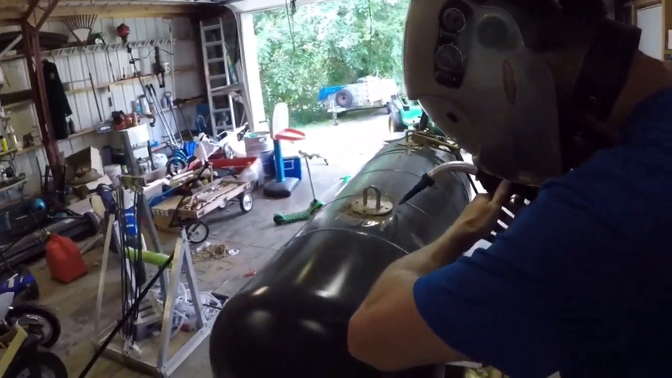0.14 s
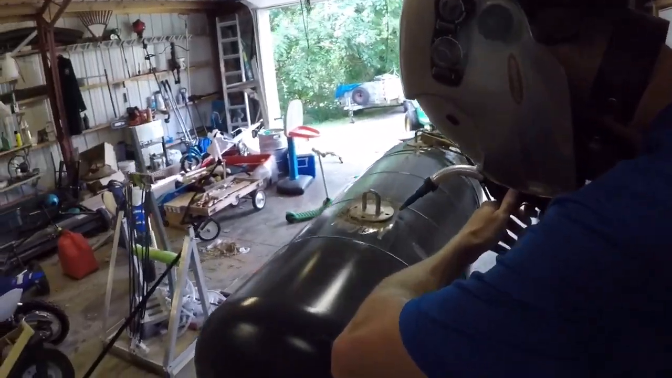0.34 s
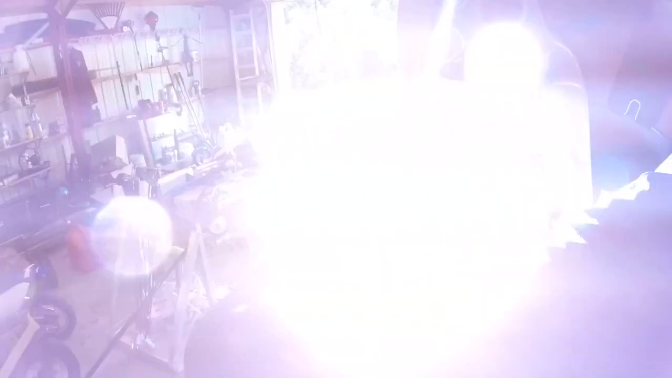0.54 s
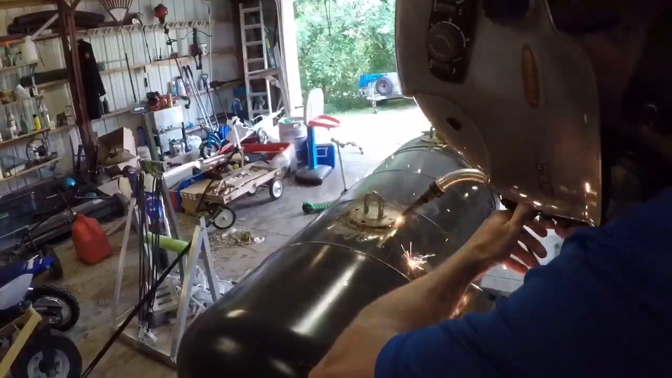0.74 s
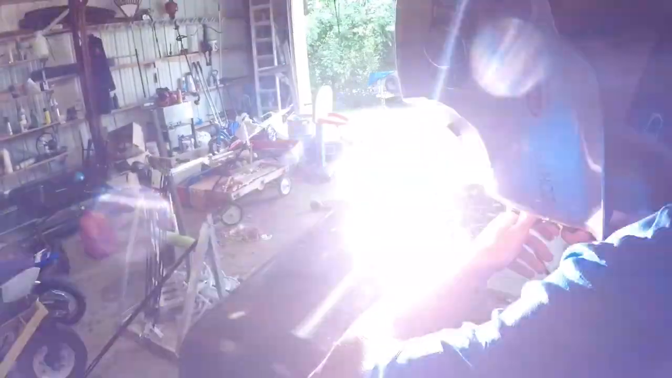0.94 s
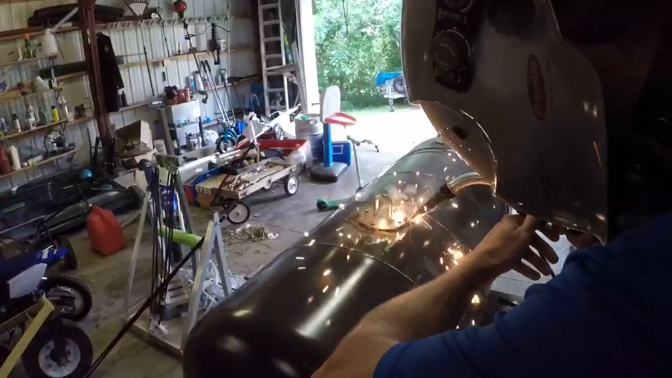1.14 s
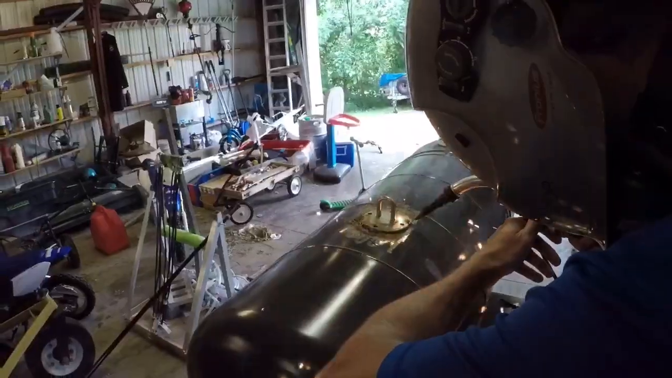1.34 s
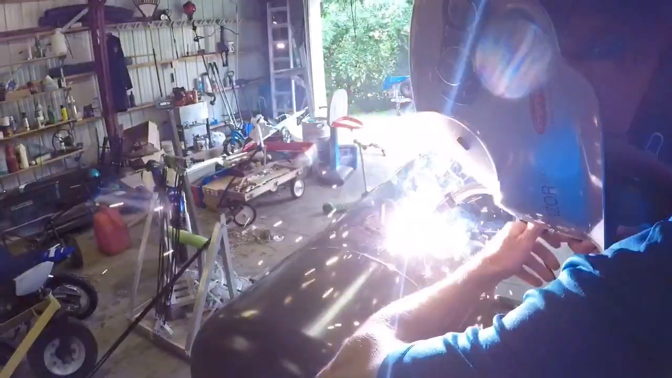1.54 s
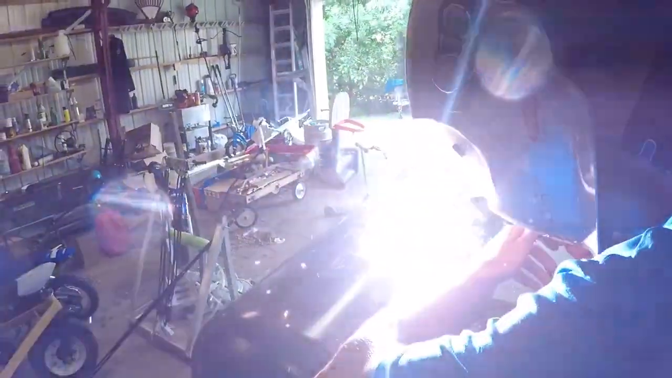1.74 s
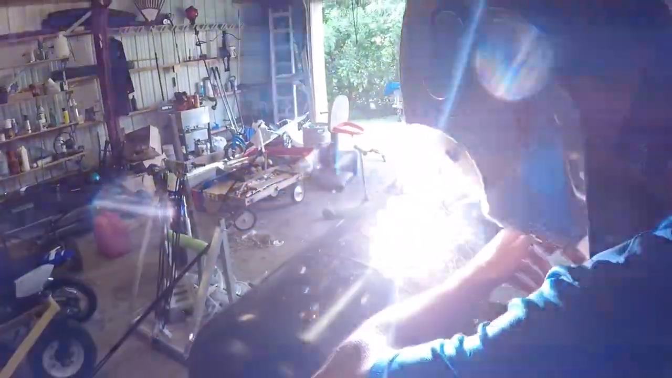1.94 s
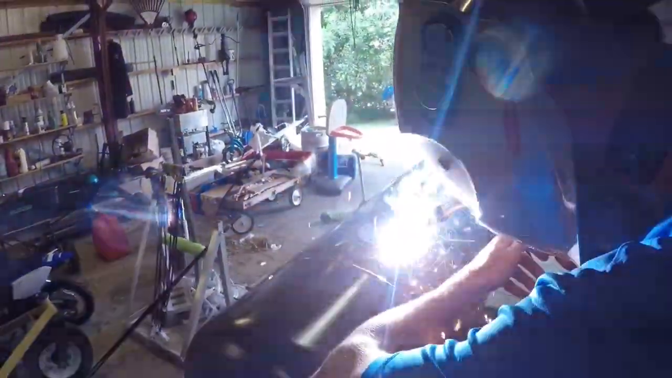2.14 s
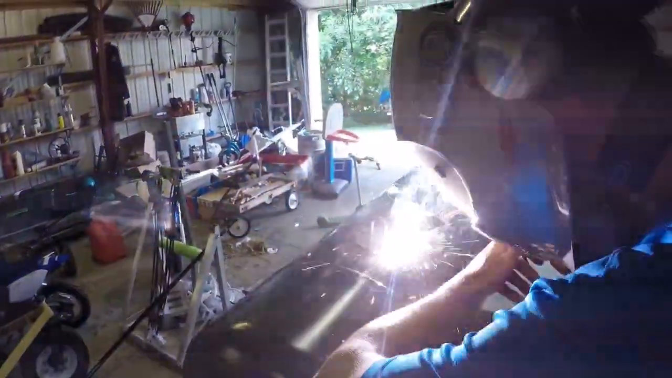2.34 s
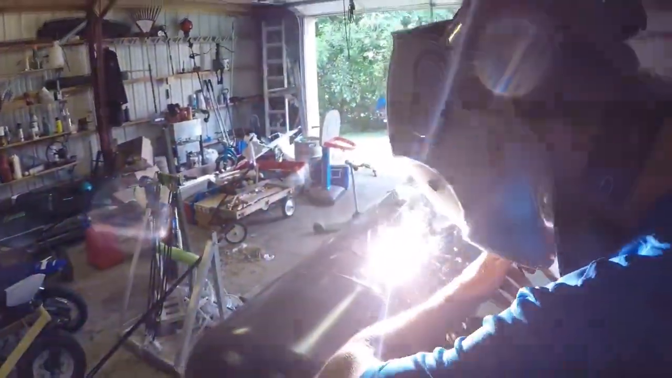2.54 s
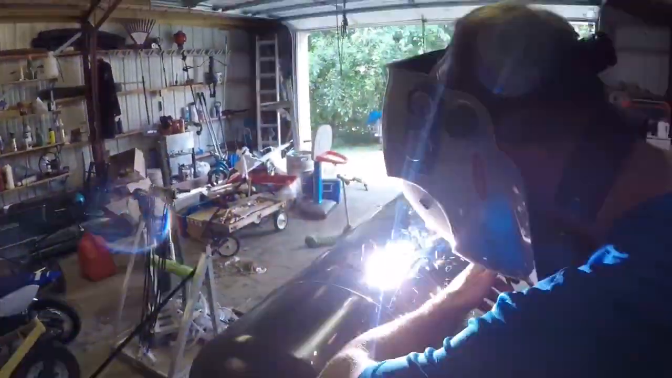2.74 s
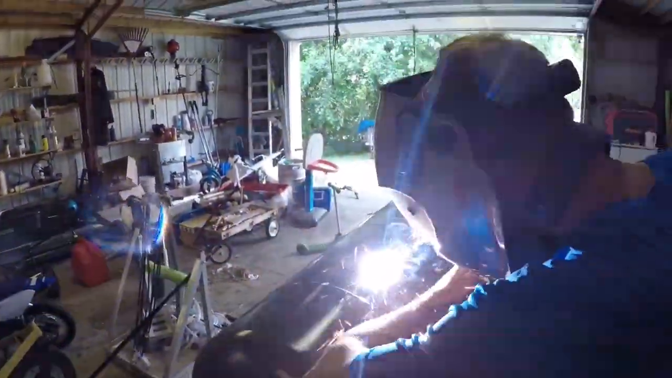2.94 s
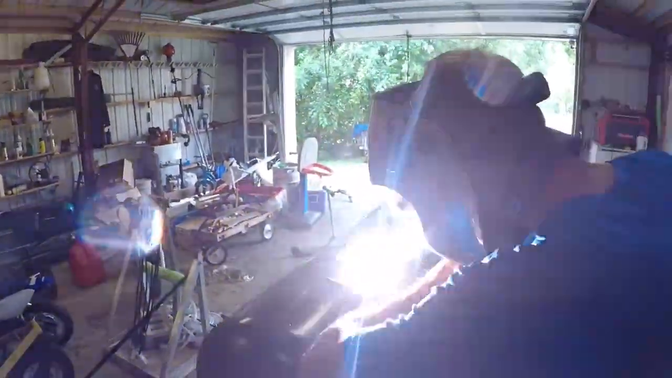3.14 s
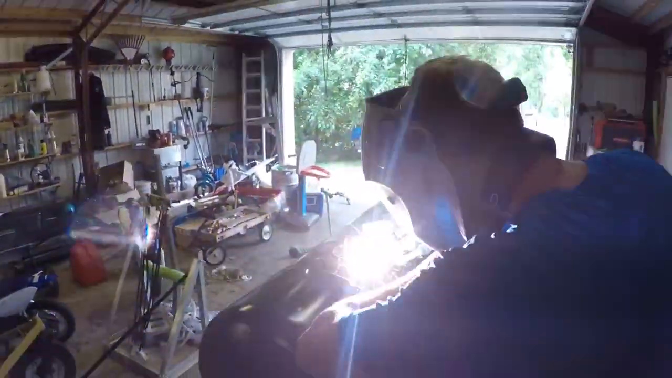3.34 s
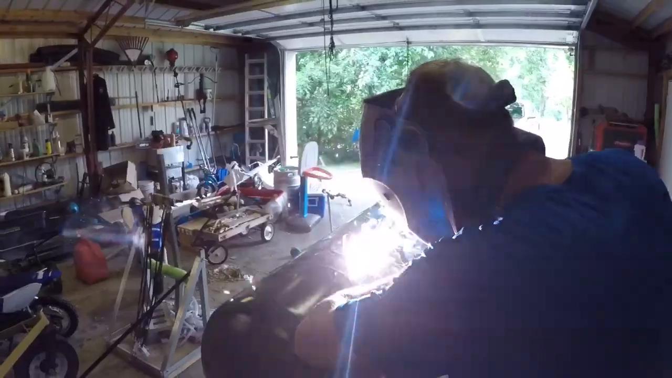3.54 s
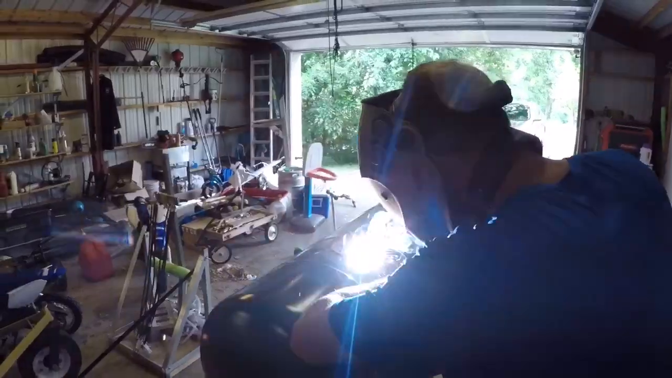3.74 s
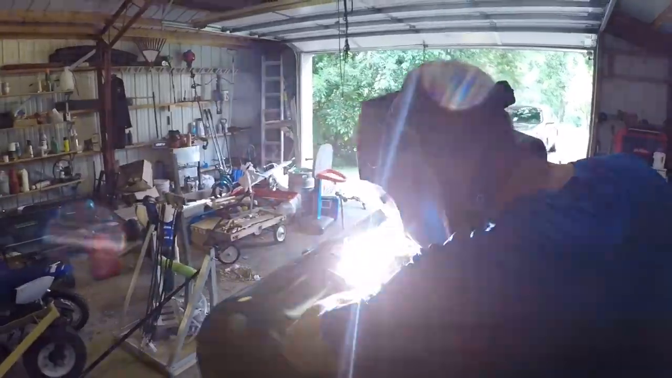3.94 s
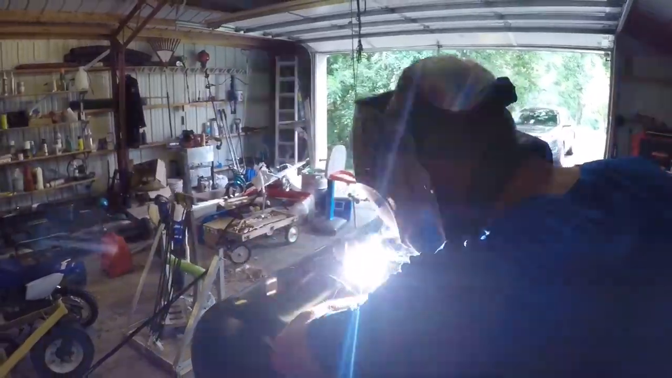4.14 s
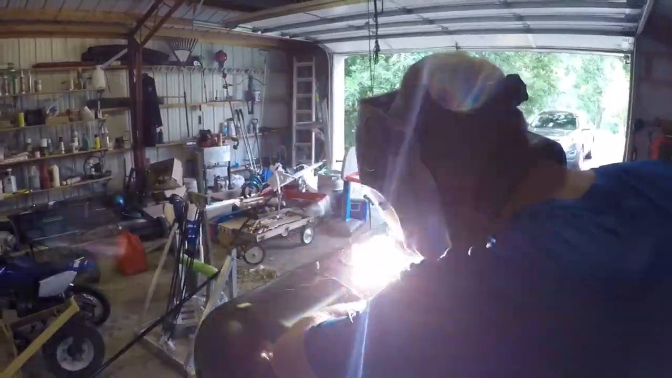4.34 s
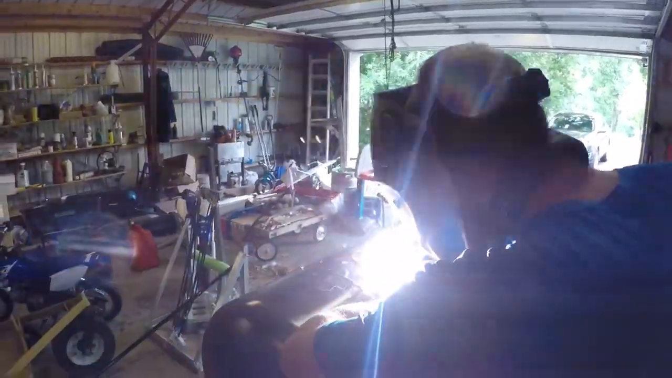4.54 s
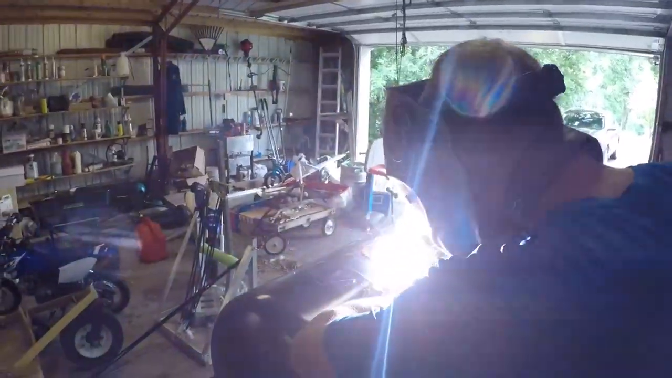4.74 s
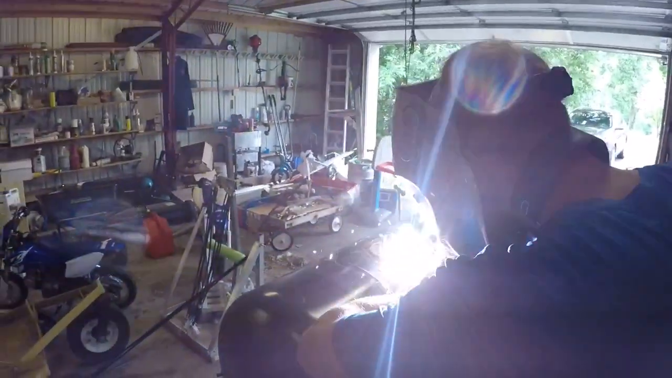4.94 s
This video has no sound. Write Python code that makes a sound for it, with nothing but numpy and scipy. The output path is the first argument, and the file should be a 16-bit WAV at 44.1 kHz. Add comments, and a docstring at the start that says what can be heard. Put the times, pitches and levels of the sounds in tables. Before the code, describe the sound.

Faint steady room noise and a soft, rapid deep throb run throughout, about eleven beats a second. A tiny high click comes at 0.06 seconds, then a brief rattle and sharp clack from the welder's case at 0.12. At 0.42 the arc first strikes: sharp snaps, dull round pops and low, bubbling sputter until about 0.63, followed by a near-quiet gap with fading echoes. A second false start pops and spits from 0.9 to 1.04, then drops away. A hard pop near 1.37 starts the held arc. Uneven frying and hiss surge strongly around 1.65-1.8, thin out, then flare repeatedly, with dry snaps scattered irregularly. After 3.3 it becomes fuller and brighter; a strong snap lands at 4.29, and the sizzle swells through 5 seconds, cutting off still active. The steel tank adds short hollow ringing; the garage answers with a brief, bright stereo reverberation around the close microphone.

```python
"""Faint steady noise and a soft low throb come first, then a trigger click and a contactor's rattle and clack.
A wire-feed welder strikes on a steel tank in a garage, an arm's length from a small camera: a few dull pops,
then the arc holds and fries. Snaps are sharp steps with a spit of noise; the sizzle is built from uneven
short circuits, sparks and hiss. The tank rings as fading tones, and decaying noise makes the garage's echoes."""
import sys
import numpy as np
from scipy import signal
from scipy.fft import rfft, irfft
from scipy.io import wavfile
from scipy.ndimage import uniform_filter1d

SR = 44100
rng = np.random.default_rng(int(sys.argv[2]) if len(sys.argv) > 2 else 0)


def bounce(signal):
    """Save signal as a 16-bit WAV file at the path given by the first command-line argument."""
    frames = np.transpose(np.atleast_2d(signal))
    limited = np.clip(frames, -1, 1)
    pcm = np.round(limited * 32767).astype(np.int16)
    wavfile.write(sys.argv[1], SR, pcm)


N = 220516
T = np.arange(N) / SR  # time in seconds


def undb(db):
    """Turn decibels into gain."""
    return 10 ** (np.asarray(db) / 20)


def unit(x):
    """Scale a signal to an rms of 1."""
    return x / np.sqrt(np.mean(x ** 2))


def over_time(points, s=T):
    """Read (time, value) points as a line at the times s."""
    return np.interp(s, *np.transpose(points))


def on_log(hz, points):
    """Read (Hz, value) points on a log-frequency axis, since we hear pitch in ratios."""
    f, value = np.transpose(points)
    return np.interp(np.log(np.maximum(hz, 1)), np.log(f), value)


def shape(x, points):
    """Colour a signal by (Hz, dB) points without shifting it in time."""
    hz = np.fft.rfftfreq(x.shape[-1], 1 / SR)
    return irfft(rfft(x) * undb(on_log(hz, points)), x.shape[-1])


def click(points, size=1024):
    """Make the shortest response, with nothing before its start, that has a colour of (Hz, dB) points."""
    hz = np.fft.rfftfreq(size, 1 / SR)
    cepstrum = irfft(np.log(undb(on_log(hz, points))))
    # folding the cepstrum onto its first half packs the energy at the start
    cepstrum[1:size // 2] *= 2
    cepstrum[size // 2 + 1:] = 0
    return irfft(np.exp(rfft(cepstrum)))


def add(out, s, sound):
    """Mix a sound in at a time in seconds."""
    i = int(np.clip(s * SR, 0, N - 1))
    out[i:i + len(sound)] += sound[:N - i]


def ring(x, response):
    """Pass a signal through a response by convolution."""
    return signal.fftconvolve(x, response)[:N]


def air(apart=1.17, level_db=-51, left_db=-2, right_db=1.5):
    """Faint steady noise of the garage: each port hears a shared noise plus one of its own."""
    # colour of the background before its lowest bass is cut: pitch_hz, level_db (per Hz, relative)
    air_colour = [(15, -32), (25, -6), (60, -1), (104, -10.5), (164, 2), (231, -5.5), (485, -17.5),
                  (3180, -25), (4730, -31), (6850, -24.5), (8470, -38), (11300, -36.5), (14000, -68)]
    mid, left, right = shape(rng.standard_normal((3, N)), air_colour)
    both = mid + apart * np.array([left, right])
    bass_cut = signal.butter(2, 110, "high", fs=SR, output="sos")
    both = signal.sosfilt(bass_cut, both)
    return undb(level_db) * unit(both) * undb([[left_db], [right_db]])


def throb(high_hz=133, low_hz=33, glide_s=0.029, swell_s=0.022, crest_s=0.041, db=-50):
    """A soft throb in the deep bass: evenly spaced beats swell and fade while sliding down in pitch."""
    first_s, period_s = .035, .0936
    out, t = np.zeros(N), T[:SR // 8]
    pitch_hz = low_hz + (high_hz - low_hz) * np.exp(-t / glide_s)
    phase = 2 * np.pi * np.cumsum(pitch_hz) / SR
    beat = np.sin(phase) * np.exp(-.5 * ((t - crest_s) / swell_s) ** 2)
    for s in np.arange(first_s, N / SR, period_s):
        # beats differ a little in loudness
        add(out, s, undb(db + rng.standard_normal()) * beat)
    return out


def trigger(at_s=.0605, hz=6900, decay_s=0.0024, db=-50):
    """The gun's trigger clicks before the arc: one high tone that dies away at once."""
    out, t = np.zeros(N), T[:1024]
    add(out, at_s, undb(db) * np.exp(-t / decay_s) * np.sin(2 * np.pi * hz * t))
    return out


def contactor(at_s=.1172, seat_s=0.0023, rattle_s=0.0097, rattle_db=-28, seat_db=-25):
    """The welder's contactor pulls in: a short rattle of fading noise, with a sharp clack as it seats."""
    # colour of the clack: pitch_hz, gain_db
    clack_colour = [(300, -6), (750, 6), (1600, 6), (2500, 1), (3900, 5), (6500, -1), (14000, 2)]
    out, t = np.zeros(N), T[:2048]
    rattle = undb(rattle_db) * np.exp(-t / rattle_s)
    clack = undb(seat_db) * (t > seat_s) * np.exp(-abs(t - seat_s) / 0.0018)
    add(out, at_s, (rattle + clack) * rng.standard_normal(len(t)))
    return ring(out, click(clack_colour))


def garage(first_s=.0078, early_db=3, early_s=0.0042, wet_db=-1):
    """Left and right echoes: strong nearby surfaces, then a dense tail of noise that fades at its own rate by pitch."""
    # colour of the garage's answer: pitch_hz, gain_db
    garage_colour = [(120, -11), (200, 0.5), (350, 0), (700, -7), (1500, -2), (3300, -5.5), (6500, -1.5),
                     (9000, 1.5), (14000, -6)]
    # reverberation time, for a fall of 60 dB: pitch_hz, fade_s
    garage_fade = [(150, 0.27), (400, 0.46), (1000, 0.85), (4000, 0.6), (7000, 0.63), (14000, 0.21)]
    # how differently the two ports hear the echoes: pitch_hz, side_over_middle (0-1)
    echo_width = [(700, 0.19), (950, 0.4), (2900, 0.85), (3300, 0.27), (4300, 0.44), (5000, 0.99),
                  (6500, 1)]
    t = T[:SR]
    hz = np.fft.rfftfreq(len(t), 1 / SR)
    mid, side = rfft(rng.standard_normal((2, len(t))))
    # the bass is nearly alike at both ports, the treble is not
    apart = np.clip(on_log(hz, echo_width), 0, 1)
    noise = (mid + np.array([[1], [-1]]) * apart * side) / np.sqrt(1 + apart ** 2)
    # each half-octave band fades at its own rate
    band = np.round(2 * np.log2(np.maximum(hz, 100))) / 2
    tail = 0
    for b in np.unique(band):
        fade = np.exp(-np.log(1000) * t / on_log(2 ** b, garage_fade))
        tail = tail + irfft(noise * (band == b), len(t)) * fade
    early = 1 + undb(early_db) * np.exp(-t / early_s)
    spectrum = rfft(tail * early)
    # even out the noise's narrow peaks, so that garage_colour alone sets the echoes' colour
    nearby_level = np.sqrt(uniform_filter1d(abs(spectrum) ** 2, size=31))
    tail = irfft(spectrum / nearby_level, len(t))
    tail = shape(tail, garage_colour)[:, :-SR // 5]
    return undb(wet_db) * np.pad(tail, ((0, 0), (int(first_s * SR), 0)))


def echoes(source, count=6):
    """The camera drifts about, so the sound fades from one pattern of echoes to the next."""
    place = T / T[-1] * (count - 1)
    total = 0
    for k in range(count):
        share = np.sqrt(np.maximum(1 - abs(place - k), 0))
        total = total + np.array([ring(source * share, side) for side in garage()])
    return total


def arc_level(attack_s=.012, release_s=.007):
    """Gain of the frying: once held, the arc grows; the power of each surge rises, holds and dies away on top."""
    # the held arc fries harder as the steel heats up: time_s, level_db (before tank, nozzle and ports)
    settling = [(1.39, -55), (1.6, -46.5), (2.5, -45.5), (3.2, -42), (4.05, -41), (4.55, -36), (5.0, -33)]
    # flare-ups, on false starts and when wire feeds in smoothly: start_s, length_s, level_db (likewise)
    surges = [(0.42, 0.2, -46.5), (0.932, 0.097, -39), (1, 0.012, -33.5), (1.634, 0.19, -36),
              (2.07, 0.12, -44), (2.242, 0.029, -36.5), (2.625, 0.045, -37), (2.832, 0.033, -36),
              (2.933, 0.16, -40.5), (3.315, 0.23, -39.5), (3.65, 0.21, -36.5), (3.9, 0.058, -39),
              (4.09, .19, -38.5), (4.345, 0.049, -48)]
    power = (T > settling[0][0]) * undb(over_time(settling)) ** 2
    for s, length_s, db in surges:
        rise = np.clip((T - s) / attack_s, 0, 1)
        fall = np.exp(-np.maximum(T - s - length_s, 0) / release_s)
        power = power + (undb(db) * rise * fall) ** 2
    return np.sqrt(power)


def sizzle(short_hz=160, uneven=.6, sparks_per_s=1800, spark_db=4, flare_s=0.006, spark_share=1.66):
    """Small short circuits follow each other unevenly; after each the arc flares, hisses and throws tiny sparks."""
    # low bubbling of the molten pool, mixed into the frying: time_s, level_db
    pool_level = [(.5, 2), (1.0, 0.5), (1.7, -9.5), (2.3, -17), (2.8, -36), (3.6, -11), (4.3, -16.5),
                  (5.0, -7.5)]
    short_db, sizzle_db, hiss_db = 3.5, -1, -7.5
    draws = rng.standard_normal((2000, 2))
    # the middle one of the gaps lasts 1 / short_hz
    gaps = np.exp(uneven * draws[:, 0])
    at = (np.cumsum(gaps) * SR / short_hz).astype(int)
    shorts = np.zeros(N)
    shorts[at[at < N]] = undb(short_db * np.minimum(draws[at < N, 1], 1.6))
    # flare_s is the fade before the square root, which makes it last twice as long
    heat = signal.lfilter([1], [1, -np.exp(-1 / (flare_s * SR))], shorts)
    flare = unit(np.sqrt(heat))
    spark_on = rng.random(N) < sparks_per_s / SR
    spark_size = undb(spark_db * np.minimum(rng.exponential(size=N), 3))
    sparks = spark_on * spark_size * rng.choice([-1, 1], N)
    fry = undb(sizzle_db) * unit(unit(shorts) + spark_share * unit(flare * sparks))
    fry = fry + undb(hiss_db) * flare * rng.standard_normal(N)
    # hold the frying's power even over about 1500 samples, so that its level follows arc_level
    nearby_power = uniform_filter1d(fry ** 2, size=1500) + 1e-6
    fry = fry * np.sqrt(np.mean(fry ** 2) / nearby_power)
    # on cold steel the arc sounds dull; it brightens once the pool is molten
    molten = np.interp(T, [1.1, 1.6], [0, 1])
    cold = shape(fry, [(150, 12), (700, 13), (2000, 1), (4000, -4.5), (7000, -1), (13000, 1.5)])
    hot = shape(fry, [(150, -8), (400, 4.5), (1000, 4), (2200, -1), (3300, -1.0), (7000, 1.5), (13000, -0.5)])
    bubbling = shape(rng.standard_normal(N), [(60, 11), (150, -0.5), (260, 4), (700, -10), (3000, -66)])
    bubbling = unit(bubbling) * undb(over_time(pool_level))
    return (1 - molten) * cold + molten * hot + bubbling


def pops(push_s=0.00037, lag_s=0.0012):
    """A stubbed wire explodes: a dense burst of spatter noise and a round push of hot air."""
    # the wire end blows off, but the faint row at 1.358 s is the trigger ticking again: start_s, push_db (hot
    # air), spatter_db (before colour), spatter_fade_s
    blow_offs = [(0.4236, -16.5, -26, 0.0081), (0.5155, -19.5, -23.5, 0.0045), (.5240, -39, -28, 0.0014),
                 (0.533, -11, -25, 0.0047), (0.5478, -9.5, -23, 0.002), (0.896, -7, -12, 0.00094),
                 (.9390, -17.5, -31, 0.00092), (0.956, -37, -30, 0.00075), (1.358, -54, -37, 0.00075),
                 (1.3744, -9, -11, 0.00053), (2.2790, -34, -50, .001), (3.6234, -26, -39, 0.0099),
                 (4.293, -30, -33, 0.00084), (4.951, -26.5, -31, 0.003)]
    out, t = np.zeros(N), T[:512]
    colour = click([(400, -2.5), (1250, 9), (3000, -3), (8000, -0.5)], size=128)
    for s, push_db, spatter_db, fade_s in blow_offs:
        push = undb(push_db) * np.exp(-.5 * ((t - lag_s) / push_s) ** 2)
        spatter = undb(spatter_db) * np.exp(-(t / fade_s) ** 2) * rng.standard_normal(len(t))
        add(out, s, push + np.convolve(spatter, colour)[:len(t)])
    return out


def snaps(rows, spit_db=-23, spit_s=0.00095, dull_share=0.68, body_db=2, body_hz=3500):
    """Each molten bridge bursts in one sharp step with a spit of metal; a duller snap has more middle."""
    snap_db = 5.5  # lift for every snap
    out, t = np.zeros(N), T[:256]
    for s, db, bright_db in rows:
        spit = undb(spit_db) * np.exp(-t / spit_s) * rng.standard_normal(len(t))
        crack = signal.unit_impulse(len(t)) + spit
        middle_db = -dull_share * bright_db
        points = [(1500, middle_db), (body_hz, body_db + middle_db / 2), (7000, middle_db + bright_db)]
        colour = click(points, size=128)
        add(out, s, undb(db + snap_db) * np.convolve(crack, colour))
    return out


def drops(arc_gain, drops_per_s=16, over_arc_db=21.5, spread_db=2):
    """Drops give more snaps, placed at random, whose level follows the arc's: makes rows for snaps()."""
    # they brighten as the weld warms: time_s, treble_over_middle_db (before a random part)
    drop_colour = [(1.5, -1), (5.0, 16)]
    chance = rng.random((200, 3))
    # one drop falls somewhere in each equal slot of time
    s = (np.arange(len(chance)) + chance[:, 0]) / drops_per_s
    arc_db = 20 * np.log10(np.interp(s, T, arc_gain) + 1e-9)
    db = arc_db + over_arc_db + spread_db * (2 * chance[:, 1] - 1)
    bright_db = over_time(drop_colour, s) + 6 * (2 * chance[:, 2] - 1)
    return np.c_[s, db, bright_db][s < T[-1]]


def nozzle(arc):
    """The gas nozzle shades the top of the arc's sound more or less."""
    # how openly it lets the highest hiss out as the gun is tilted: time_s, treble_gain_db
    openness = [(.4, -1), (1.0, -3), (1.7, 0), (2.2, 3), (2.8, 1), (3.3, -1), (4.2, 0), (4.9, -1)]
    top = shape(arc, [(7000, -40), (8500, -8), (10500, 0)])
    return arc + (undb(over_time(openness)) - 1) * top


def tank(arc):
    """The steel shell rings under the arc: each of its own pitches sounds and fades."""
    # ring of the tank: pitch_hz, gain_db (at that pitch), fade_s (for a fall of 60 dB)
    tank_modes = [(158.3, -2, 0.048), (191, -6.5, 0.19), (261, -8, 0.16), (360, 1, 0.64), (719.5, 2.5, 0.1),
                  (790, -2, 0.098), (1092, -6, 0.15), (1330, -17, 0.1), (1760, -8, 0.035), (2376, -2, 0.11),
                  (3360, -14, 0.17), (4400, -7, 0.011), (6800, -3, .06)]
    t = T[:SR]
    modes = 0
    for hz, db, fade_s in tank_modes:
        fade = np.exp(-np.log(1000) * t / fade_s)
        modes = modes + undb(db) * 2 * fade / fade.sum() * np.cos(2 * np.pi * hz * t)
    return ring(arc, modes)


def ports(sound, turn_hz=660, turn_q=0.66):
    """The camera's two microphone ports colour each side and shed bass; the right lags in low middle and treble."""
    # how each port colours a spark, before the bass is shed: pitch_hz, left_db, right_db
    port_colour = [(103, -3.5, 0), (204, -3.5, 5), (335, -5, -2.5), (575, 3, 4), (880, -3, 3),
                   (1460, -3.5, 1.5), (1920, 2.5, -2), (2250, 0, 0.5), (3360, 6.5, 8.5), (4340, 5.5, 3),
                   (5280, 7, 0.5), (6200, 10, 1), (7430, 7.5, -3), (8380, -5.5, -3.5),
                   (11600, -12.5, -12.5), (12600, -6.5, -7), (14000, -10, -13), (16100, -20, -28)]
    # the left port leads in the treble: pitch_hz, lead_radians
    port_lead = [(800, 0), (1400, 0.74), (2400, 1), (6000, 0), (7000, 1.8), (8000, 2), (10500, 5),
                 (11300, 7)]
    hz, left_db, right_db = np.transpose(port_colour)
    shared = click(np.c_[hz, (left_db + right_db) / 2])
    lean_db = (left_db - right_db) / 2
    left = shape(ring(sound[0], shared), np.c_[hz, lean_db])
    right = shape(ring(sound[1], shared), np.c_[hz, -lean_db])
    # taking away twice the peak turns the wave around turn_hz but keeps its level
    b, a = signal.iirpeak(turn_hz, turn_q, fs=SR)
    right = right - 2 * signal.lfilter(b, a, right)
    lag = on_log(np.fft.rfftfreq(N, 1 / SR), port_lead)
    right = irfft(rfft(right) * np.exp(-1j * lag), N)
    return shape(np.array([left, right]), [(40, -13), (105, -15.0), (140, 0)])


def scene(far_db=-5):
    """Arc and tank close by, the welder's case further off; the garage answers both, over the background."""
    # snaps of the wire shorting and burning free: start_s, level_db (before lift), treble_over_middle_db
    wire_snaps = [(0.4259, 0, 2), (0.447, -7, -8), (0.4685, -7, -4), (0.4732, -13.5, -20),
                  (0.4912, -12.5, -13), (0.5677, -18, -25), (0.8971, -7.5, -14.5), (1.0129, -14, -4),
                  (1.0229, -11, -11.5), (1.3756, -4.5, -7), (1.3864, -12, -6), (1.3948, -9.5, 9),
                  (1.4873, -6, 0.5), (1.5101, -7.5, 4.5), (1.5817, -12, 0), (1.5962, -9, 6.5),
                  (1.6477, -17, 4), (1.716, -11, 13), (1.7932, -11.5, -4), (1.8352, -7, 1),
                  (1.8481, -10.5, -5), (2.0427, -10, 1), (2.1063, -8.5, 1), (2.2102, -5, 6),
                  (2.2444, -11.5, 8), (2.2794, -8, -7.5), (2.2927, -12, -6.5), (2.3009, -12, -4),
                  (2.3141, -10, -2), (2.332, -10.5, -2), (2.3432, -8.5, 1), (2.3626, -13, 9),
                  (2.4995, -10.5, 1.5), (2.627, -10.5, 3.5), (2.6719, -13.5, 7), (2.8373, -14.5, 12),
                  (2.8625, -10, 4), (2.8771, -11.5, -3), (2.8855, -6.5, -1), (2.8955, -7, 4),
                  (2.9406, -10.5, 8), (2.9837, -6.5, 6), (3.0404, -9.5, 6), (3.047, -15, 5),
                  (3.3165, -14, -2), (3.3296, -12.5, 11), (3.4092, -13, 3), (3.4948, -8, 2),
                  (3.692, -11, 10), (3.7, -9.5, 6), (3.7526, -12, 0), (3.811, -10, 6), (3.8469, -12, 6),
                  (3.8531, -7.5, 4), (4.106, -17, -1), (4.1592, -11.5, 13), (4.1983, -9, 9),
                  (4.2944, -4.5, -0.5), (4.4223, -11, 7), (4.6833, -8, 14), (4.7187, -13, 5),
                  (4.8323, -22, -3)]
    arc_gain = arc_level()
    drop_snaps = snaps(drops(arc_gain), spit_db=-22.5, spit_s=.0014)
    arc = nozzle(snaps(wire_snaps) + drop_snaps + pops() + arc_gain * sizzle())
    near = arc + tank(arc) + trigger()
    far = contactor()
    heard = near + undb(far_db) * far + echoes(near + far)
    return ports(heard) + throb() + air()


def record(dry):
    """The camera rounds the highest peaks and cuts the top of the treble."""
    ceiling, top_hz = .8, 15500
    rounded = ceiling * np.tanh(dry / ceiling)
    return signal.sosfilt(signal.ellip(8, .2, 70, top_hz, fs=SR, output="sos"), rounded)


dry = scene()
out = record(dry)
bounce(out)
```